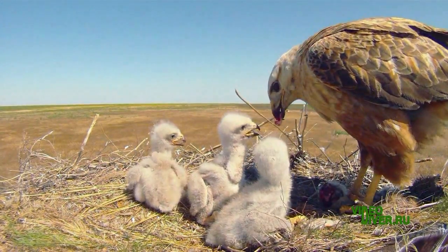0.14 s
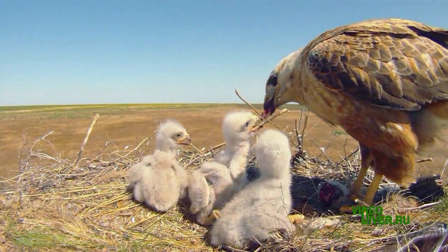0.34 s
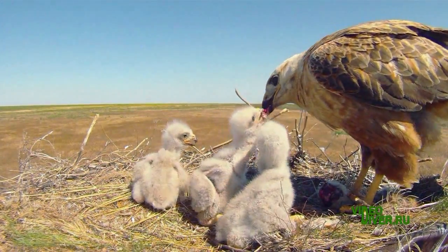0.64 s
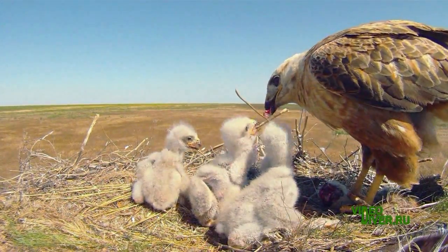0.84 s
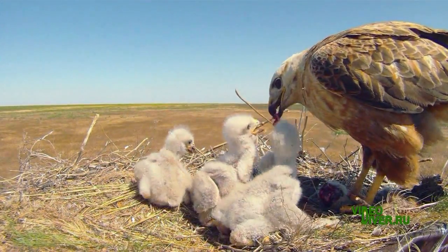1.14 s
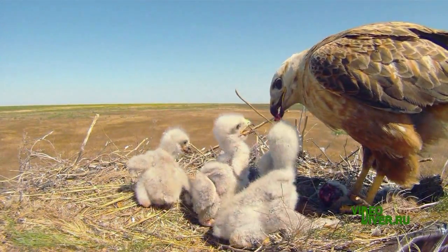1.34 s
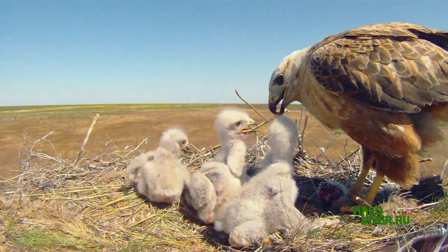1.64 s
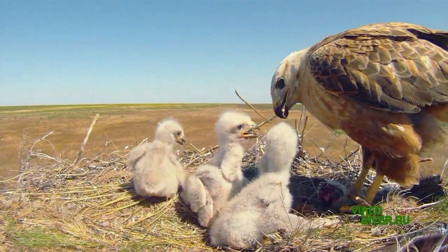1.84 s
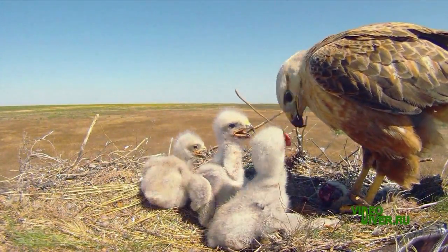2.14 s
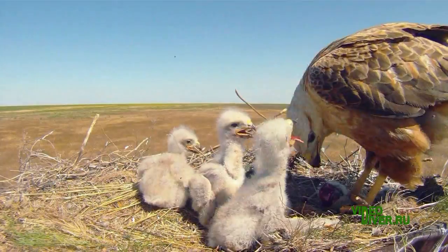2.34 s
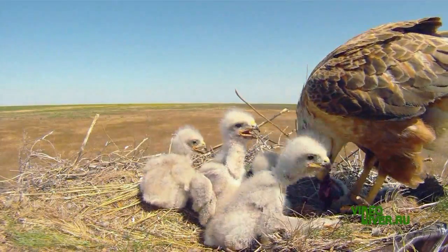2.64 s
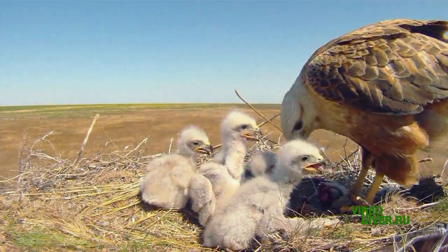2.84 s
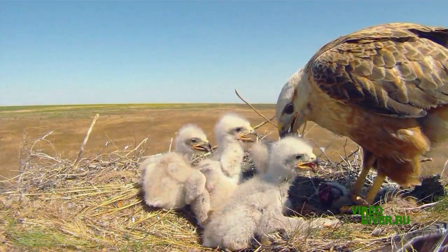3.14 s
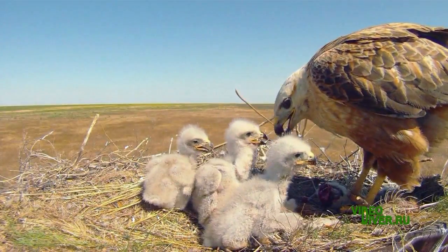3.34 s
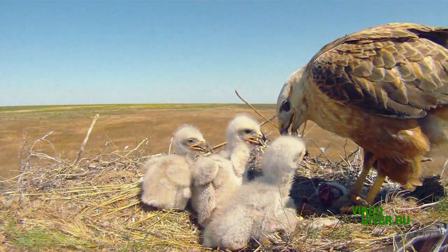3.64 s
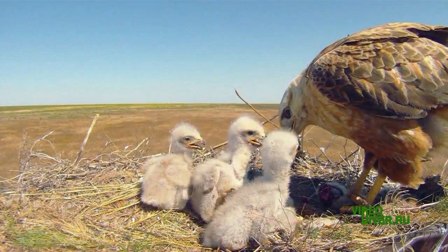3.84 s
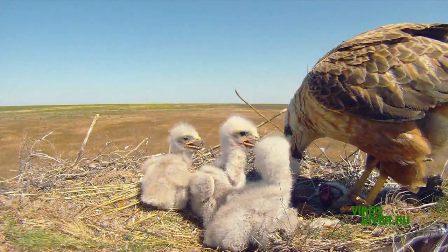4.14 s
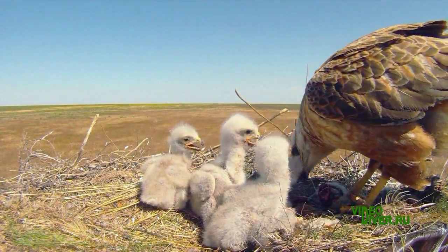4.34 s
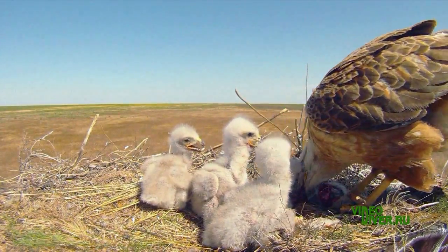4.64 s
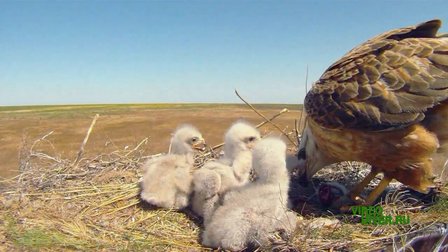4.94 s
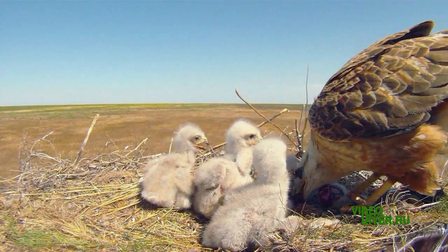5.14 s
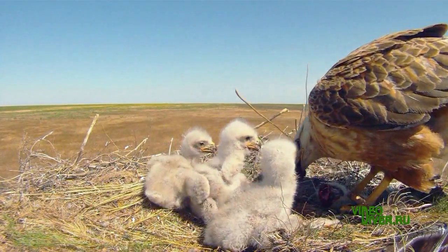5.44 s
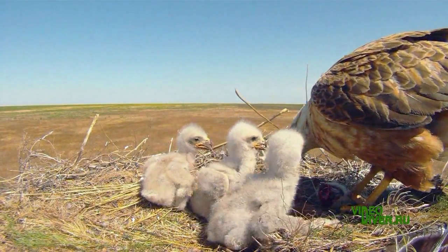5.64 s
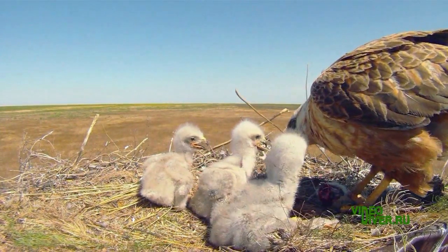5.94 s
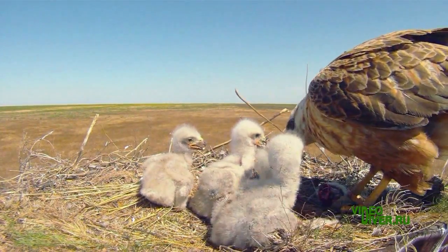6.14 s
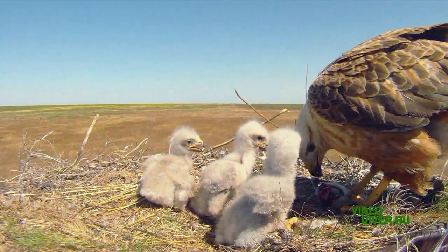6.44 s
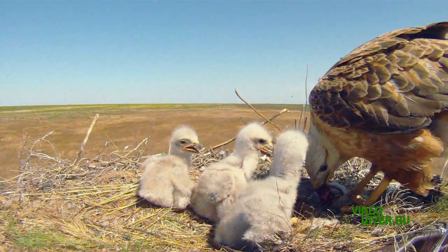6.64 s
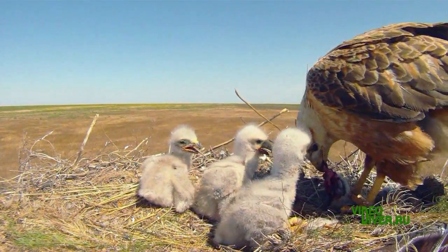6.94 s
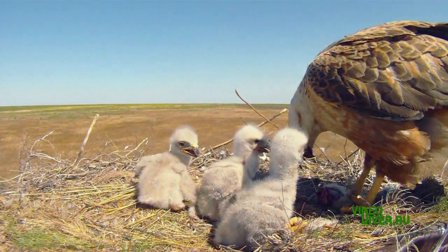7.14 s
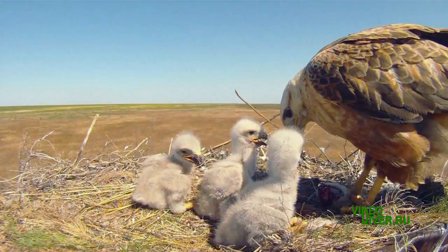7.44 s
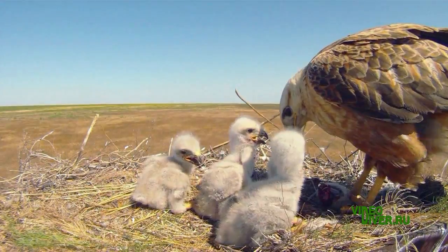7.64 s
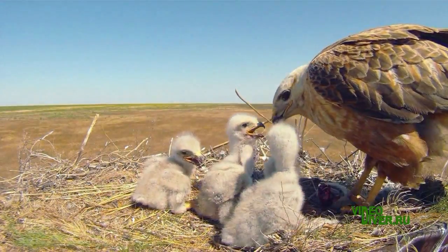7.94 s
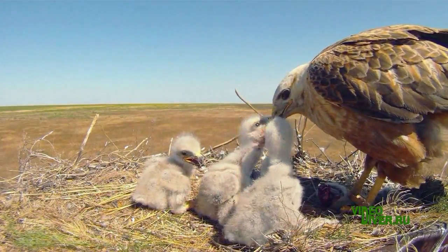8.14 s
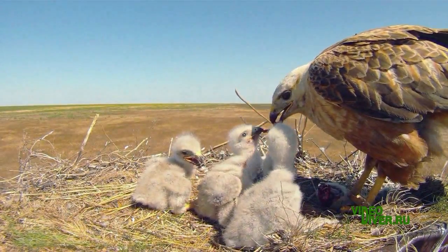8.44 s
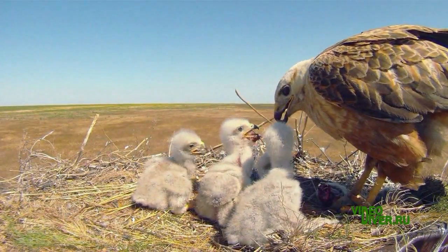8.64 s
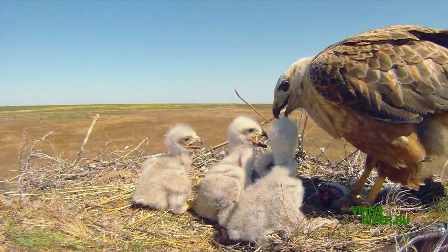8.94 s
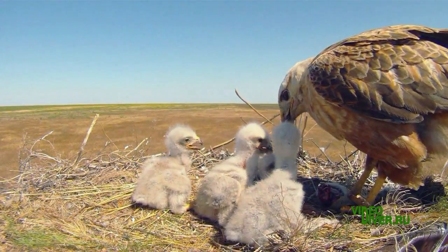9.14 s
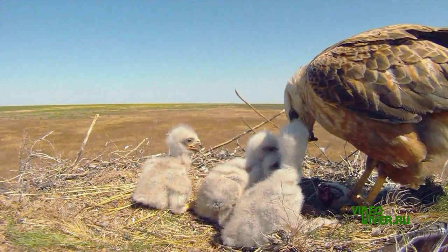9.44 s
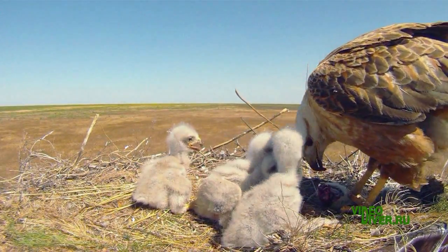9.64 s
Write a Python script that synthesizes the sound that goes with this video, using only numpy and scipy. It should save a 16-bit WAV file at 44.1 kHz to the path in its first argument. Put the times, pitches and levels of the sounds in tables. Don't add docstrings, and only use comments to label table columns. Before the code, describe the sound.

Downy raptor chicks give short sharp chips, croaks and falling peeps at an open nest, with far larks twittering and light wind bumps on the microphone.

```python
import sys
import numpy as np
from scipy import signal
from scipy.fft import rfft, irfft, next_fast_len
from scipy.io import wavfile
from scipy.ndimage import uniform_filter1d, map_coordinates

SR = 44100
rng = np.random.default_rng(int(sys.argv[2]) if len(sys.argv) > 2 else 0)


def dump_mix(stems):
    frames = np.atleast_2d(stems).T
    limited = np.clip(frames, -1, 1)
    pcm = np.round(limited * 32767).astype(np.int16)
    wavfile.write(sys.argv[1], SR, pcm)


def volts_from_decibels(level):
    exponent = np.asarray(level, float) / 20
    return 10 ** exponent


N = 431738

# (time [s], level [dB])
WIND = [(0, -38), (.4, -54.5), (.72, -41.5), (1.2, -49.5), (4, -60.5), (6.27, -56.5), (6.36, -39),
        (6.7, -45.5), (7, -59.5), (8.3, -47), (9.79, -61.5)]
# (frequency [Hz], density [dB per Hz])
BUFFET = [(8, -3.5), (25, 1), (50, -17.5), (120, -33), (200, -80)]
AIR = [(30, -14), (45, 1.5), (120, -6), (370, -12.5), (800, -19.5), (1550, -23), (4000, -21.5), (6870, -32),
       (11200, -33.5), (13600, -40.5)]
# (frequency [Hz], level [dB])
WHINE = [(9132, -89), (10880, -88.5), (11741, -92), (13297, -96)]

# (time [s], low flock level [dB], high flock level [dB])
CHORUS = [(0, -58.5, -59.5), (.7, -59, -64), (1.5, -55, -62.5), (2.6, -57, -61.5), (3.6, -57, -61.5),
          (6.2, -60, -61.5), (6.8, -61.5, -65), (7.7, -56, -57), (8.5, -60, -65.5), (9.79, -60, -64)]
# (frequency [Hz], density [dB per Hz])
LOW_LARKS = [(1500, -33), (2200, -6), (3000, -5), (3900, -1.5), (4600, -1.5), (5500, -48)]
HIGH_LARKS = [(3800, -31), (4400, 0), (5300, -3), (6200, -12.5), (7000, -19), (8000, -50)]
# (time [s], length [s], middle pitch [Hz], level [dB])
LEVEL_NOTES = [(.056, .044, 3860, -52.5), (.246, .054, 3440, -56), (1.6, 0.036, 3488, -55),
               (2, 0.05, 5093, -52), (2.855, .035, 5400, -55), (3.29, .045, 5400, -57),
               (5.252, .04, 4950, -55), (4.1, .11, 4280, -57.5), (1.815, .06, 5600, -58),
               (1.52, .07, 5100, -57), (6.705, .045, 5850, -62.5), (3.43, .09, 4700, -58),
               (.45, .1, 4100, -53.5), (9.62, .06, 4400, -54), (5.55, .045, 4550, -53),
               (6.955, 0.044, 4300, -56), (6.996, 0.079, 3880, -50.5), (7.205, .095, 5150, -52.5),
               (7.225, .07, 5750, -58), (7.429, .026, 3720, -49.5), (7.455, 0.057, 5400, -53.5),
               (7, .028, 4691, -55), (7.956, .053, 5200, -51), ]
FALLING_NOTES = [(1.443, 0.037, 3050, -56), (3.58, .06, 3700, -58), (8.612, .03, 3500, -56),
                 (7.717, .099, 2760, -61.5), (9.542, 0.049, 2780, -57)]
RISING_NOTES = [(1.077, 0.014, 4700, -44), (1.812, 0.011, 3960, -42), (3.87, .067, 4700, -59),
                (5.12, .012, 4520, -50), (5.815, .05, 4150, -56), (7.675, .05, 4400, -58),
                (3.545, .022, 4500, -52), (7.555, 0.0245, 4984, -47), (8.2775, 0.011, 4050, -44),
                (8.969, 0.018, 4130, -45.5), (8.99, 0.03, 5300, -57)]
ARCHED_NOTES = [(1.27, 0.1, 5620, -54.5), (1.515, 0.09, 5560, -56), (1.769, 0.1, 5740, -54.5),
                (7.487, 0.073, 4300, -48.5), (8.235, .04, 5300, -57)]
DIPPED_NOTES = [(.018, 0.036, 4140, -51.5), (4.082, .08, 3980, -56), (4.436, 0.085, 4050, -56),
                (7.172, 0.02, 3880, -53)]
PLUNGING_NOTES = [(6.568, .012, 4600, -53), (7.206, .05, 2900, -55.5)]
CLEAR_NOTES = [(.765, .026, 3010, -62), (.81, 0.08, 2700, -60), (.965, .03, 3050, -59),
               (4.72, 0.051, 5160, -58), (5.03, .032, 4600, -54), (1.71, 0.075, 3000, -58),
               (3.955, 0.032, 4300, -63), (7.955, 0.033, 5430, -52), (1.955, .02, 4000, -54),
               (8.957, .036, 2450, -55), (2.24, 0.066, 5100, -62), (2.295, .04, 3500, -58),
               (2.44, .04, 3040, -56), (6.655, .045, 4530, -58), (7.732, 0.051, 5060, -47.5),
               (9.028, .01, 5050, -44)]
SLIDING_NOTES = [(2.72, .15, 4050, -57.5), (5.895, .13, 4870, -56), (6.03, 0.052, 4200, -51),
                 (8.262, .016, 4500, -52), (8.293, 0.046, 4000, -51), (2.175, .045, 2300, -61),
                 (2.315, .04, 2350, -58.5), (2.335, .06, 4200, -57), (2.49, 0.038, 2900, -57),
                 (7.61, .105, 3350, -57)]
HOOKED_NOTES = [(7.777, .026, 3700, -50), (7.822, 0.023, 3700, -53), (7.852, 0.021, 3900, -56)]
UP_GLIDES = [(3.395, .055, 3250, -60), (3.483, .035, 3250, -60), (3.13, 0.034, 3800, -53),
             (1.262, .035, 4300, -57), (1.3, .025, 4700, -59), (8.54, .018, 4000, -57),
             (1.612, .016, 4200, -53)]
DOWN_GLIDES = [(3.266, .025, 3300, -60), (3.368, 0.0275, 3900, -59), (4.068, .035, 2700, -60),
               (8.562, 0.032, 4450, -55), (9.4, 0.0174, 4150, -54), (7.93, .06, 2800, -60),
               (3.81, 0.0202, 3200, -56)]
NOTE_SHAPES = [(LEVEL_NOTES, 1.002, 0.97, 1.05), (FALLING_NOTES, 1.06, .93, 1),
               (RISING_NOTES, .87, 1.1, .7), (ARCHED_NOTES, .84, .88, .85), (DIPPED_NOTES, 1.1, 1.04, .5),
               (PLUNGING_NOTES, 1.14, .66, .6), (CLEAR_NOTES, .98, 1, .5), (SLIDING_NOTES, 1.08, .92, .75),
               (HOOKED_NOTES, 1.36, 1.3, .4)]
# (time [s], notes [count], spacing [s], pitch [Hz], level [dB])
TRILLS = [
    (3.992, 5, .018, 4620, -54),
    (8.478, 3, .024, 4300, -58),
]

# (time [s], pitch [Hz], level [dB])
WHISTLES = [
    [(5.5673, 3180, -60), (5.5898, 4060, -39), (5.6197, 4350, -43), (5.6631, 5570, -39.5),
     (5.705, 5860, -43), (5.7574, 5980, -47)],
    [(5.738, 5450, -49), (5.7559, 5276, -48.5), (5.79, 5800, -45), (5.81, 5900, -45), (5.818, 6150, -46),
     (5.8801, 6270, -45), (5.9355, 6480, -47.4), (5.9924, 6223, -54), (6.045, 3950, -55)],
    [(7.5114, 4830, -46), (7.5758, 5410, -39), (7.6027, 5850, -38.5), (7.6416, 5830, -44),
     (7.715, 6330, -43), (7.735, 6300, -44), (7.8092, 6790, -43), (7.8856, 6270, -48), (7.9065, 5550, -52),
     (7.933, 3900, -51)],
    [(9.3612, 3187, -49), (9.3941, 4040, -40), (9.4046, 4630, -43), (9.432, 4820, -45)],
    [(9.424, 5050, -42), (9.4465, 5410, -39), (9.5513, 6180, -42.5), (9.615, 6520, -47.5),
     (9.629, 6400, -45), (9.69, 6810, -48), (9.745, 6960, -51), (9.7893, 6760, -48)],
]
# (time [s], length [s])
FLUTTERS = [(5.62, .03), (5.665, .06), (5.79, 0.021), (5.866, 0.042), (7.545, 0.027), (7.606, .075),
            (9.402, 0.027), (9.475, 0.056)]

# (time [s], peak level [dB])
CLICKS = [(.748, -47), (.768, -47), (.784, -50), (.798, -49), (.814, -49), (.857, -51), (7.045, -47),
          (7.065, -44), (7.077, -47), (8.086, -45), (8.092, -49), (8.103, -50)]

# (time [s], length [s], chest croak level [dB], throat rasp level [dB])
CROAKS = [(1.6, 0.022, -47.5, -52), (1.85, .045, -54.5, -65), (2.256, 0.013, -49.5, -66),
          (2.7, 0.082, -59.5, -54.5), (3.173, 0.011, -46.5, -50), (3.19, .02, -55, -52),
          (3.537, 0.073, -54.5, -54), (4.159, 0.055, -50.5, -51), (4.597, 0.041, -55, -50),
          (4.633, 0.0122, -56, -35.5), (4.646, .032, -54.5, -46), (4.953, 0.05, -50.5, -46),
          (5.348, 0.044, -51.5, -49), (5.726, 0.053, -52.5, -45), (6.138, 0.039, -52.5, -48.5),
          (6.764, .045, -51.5, -49)]
# (time [s], length [s], wide hiss level [dB])
HISSES = [(.339, 0.021, -47), (1.878, .02, -54), (3.628, 0.026, -44), (4.628, 0.037, -46.5),
          (5.196, .028, -43.5), (8.006, 0.027, -44.5), (8.335, 0.0285, -45.5), (8.755, 0.035, -44.5),
          (9.035, 0.042, -50)]

# (peak time [s], pitch [Hz], level [dB], tail [s], loss over tail [dB])
CHIPS = [(0.3378, 4540, -32.5, 0.0044, 7), (1.336, 2214, -43.5, 0.0075, -3),
         (1.606, 3840, -39.5, 0.0082, 16), (1.882, 4130, -32, 0.004, 8), (2.2569, 3900, -43.5, 0.013, 12),
         (2.555, 5000, -35, .005, 10), (2.7517, 4120, -39.5, 0.013, 20), (3.172, 3920, -32, 0.0095, 31),
         (3.587, 4220, -31.5, 0.0033, 13), (3.592, 3300, -42, 0.0065, 7), (3.6327, 4320, -28, .002, 2),
         (4.638, 4400, -35, .004, 3), (5.197, 4600, -32, .003, 4), (6.774, 3900, -43, .004, 12),
         (8.0075, 4990, -41, 0.0043, -1), (8.3372, 4800, -36, 0.0045, 3), (8.7601, 5520, -38, 0.0051, 15),
         (9.038, 4800, -37, 0.0044, -3)]
# (start [s], scoop and bend [s], top pitch [Hz], slide [kHz per s], level [dB])
CLEAR_PEEPS = [(4.669, .027, 5100, 148, -30.5)]
HISSY_PEEPS = [(5.202, 0.016, 5250, 239, -30), (8.0132, 0.0091, 4500, 190.4, -32.5),
               (8.343, 0.012, 4950, 198, -32), (8.765, .02, 5400, 199.5, -30),
               (9.0466, 0.018, 5000, 229.7, -32)]
LOW_PEEPS = [(.3438, 0.0067, 3290, 210, -35.5), (1.886, 0.011, 3250, 230, -35),
             (3.636, .008, 3800, 175, -33.5)]
SCOOPED_PEEPS = [(1.978, .028, 5300, 164, -31.5)]
SOFT_PEEPS = [(1.091, .008, 4560, 150, -34)]
# (scoop share of time [0-1], scoop depth [Hz], lowest note [Hz], fade on it [s], soft start [dB],
# throat as (pitch [Hz], level [dB]))
CLEAR_CHICK = (0.69, 250, 2210, .009, 9.3, [(2100, -2.5), (2700, -3.5), (3300, -4), (3900, 1), (4600, -6),
               (5200, -6)])
HISSY_CHICK = (0.199, 420, 1870, 0.0041, 3.6, [(1800, -7.5), (2100, -6), (2700, -3.5), (3300, 1.4),
               (4000, -3), (4700, -9)])
LOW_CHICK = (0.245, 300, 1740, 0.0048, 5.9, [(1700, -5.5), (2100, -4), (3000, 1.5), (3900, -1.5)])
SCOOPING_CHICK = (.48, 1200, 2150, 0.0045, .4, CLEAR_CHICK[-1])
SOFT_CHICK = (.2, 100, 2450, 0.0076, 3, [(2400, -4), (3000, -1), (3800, -3), (4500, -12)])
# (note pitch [Hz], level [dB])
PEEP_OVERTONE = [(1700, -2.5), (2300, -4.5), (3000, -13), (3700, -24.5), (4300, -34), (5000, -48)]
DROP_OVERTONE = [(1700, 17), (2100, 21), (2800, 1), (3400, -30), (4000, -59)]
HARD_OVERTONE = [(2000, -3), (3000, -8), (3600, -32), (4200, -50)]
# (upper note pitch [Hz], level [dB])
HALF_NOTE = [(2600, -43), (3000, -14), (3500, -13), (4000, -40)]
# (time [s], pitch [Hz], level [dB])
DRAWN_OUT = [(1.7055, 3800, -41), (1.709, 4400, -40), (1.716, 4390, -42), (1.725, 4050, -33.5),
             (1.735, 3700, -34.5), (1.742, 2750, -41), (1.748, 2150, -39), (1.757, 1800, -56)]
KINKED = [(6.782, 4700, -54), (6.788, 5040, -49), (6.796, 4690, -47), (6.8005, 4050, -30.5),
          (6.8025, 3500, -37), (6.804, 2850, -35.5), (6.811, 2460, -46), (6.818, 2100, -52),
          (6.823, 1850, -57)]
# (break time [s], level [dB], lead-in top [Hz], lower note level [dB], lowest pitch [Hz])
CRIES = [
    (2.5985, -26, 6400, -2.5, 2310),
    (3.2377, -24.5, 5400, -2.5, 2323),
]
# (time from break [s], pitch [ratio to top], level [dB])
CRY_LEAD = [(-.032, .7, -14), (-.027, .92, -17), (-.021, 0.96, -16.5), (-.015, .99, -14),
            (-.0095, .87, -15.5)]
# (time from break [s], pitch [Hz], level [dB])
CRY_UPPER = [(-.004, 4030, 1), (-.0003, 3760, -1)]
# (time from break [s], pitch [ratio to lowest], level over lower note [dB])
CRY_LOWER = [(.0025, 1.22, -4.5), (.006, 1.001, -0.1), (.019, .91, -42)]
# (tick time [s], tick level [dB], loudest drop time [s], drop level [dB],
# throat resonance depth [0-1])
DROPS = [
    (4.95, -30.5, 4.9955, -20, 0.97),
    (5.345, -36.5, 5.3895, -20, 0.98),
    (5.725, -30, 5.7785, -20, 0.97),
    (6.141, -32, 6.1775, -22.5, 0.92),
]
DROP_PACES = [1, 0.99, 1, .85]
# (time from loudest [s], pitch [Hz], level [dB])
TICK = [(-.006, 3670, -16), (-.002, 3750, -7), (0, 3900, 1.5), (.0045, 3780, -16)]
DROP = [(-.036, 6334, -56), (-.022, 6500, -40), (-.008, 5400, -32), (-.003, 4330, -5), (0, 3920, 0),
        (.0033, 3560, -5.5), (.0046, 2950, -22), (.011, 2454, -28.5), (.023, 1620, -38.5)]
# (time [s], pitch [Hz], level [dB])
OWN_DROPS = [
    [(4.167, 3900, -50), (4.169, 3950, -39), (4.1715, 3900, -54)],
    [(4.175, 5900, -65), (4.192, 6850, -56), (4.203, 5600, -50), (4.2062, 4700, -38), (4.2095, 4040, -20),
     (4.213, 3710, -24), (4.218, 3150, -40), (4.2235, 2450, -46), (4.236, 1740, -59)],
    [(4.598, 3700, -46), (4.602, 3900, -31), (4.605, 4420, -33), (4.6085, 3650, -36)],
    [(4.626, 6700, -60), (4.634, 6300, -51), (4.6445, 5510, -53), (4.647, 5040, -30), (4.653, 4250, -23),
     (4.6565, 3890, -20), (4.6595, 3500, -23), (4.661, 3050, -35), (4.671, 1600, -41)],
    [(4.716, 2750, -46), (4.722, 2410, -48), (4.728, 2150, -56)],
]


def unit(x):
    return x / np.sqrt(np.mean(x ** 2) + 1e-20)


def along(points, hz):
    f, v = np.transpose(points)
    return np.interp(np.log(hz + 1), np.log(f + 1), v)


def curves(rows):
    s, *cols = np.transpose(rows)
    return [np.interp(np.arange(N) / SR, s, c) for c in cols]


def wobble(rate_hz, size=N):
    knots = rng.standard_normal(int(size * rate_hz / SR) + 4)
    return map_coordinates(knots, [np.arange(size) * rate_hz / SR], order=1)


def coloured(x, spectrum):
    m = next_fast_len(len(x) + 8192)
    gain = volts_from_decibels(along(spectrum, np.fft.rfftfreq(m, 1 / SR)))
    return unit(irfft(rfft(x, m) * gain, m)[:len(x)])


def add(track, s, x):
    part = track[max(round(s * SR), 0):][:len(x)]
    part += x[:len(part)]


def note(rows, fade_s, overtone, rough, bend_s=0.0013, waver=0):
    s, hz, db = np.transpose(rows)
    t = np.arange(s[0], s[-1], 1 / SR)
    hz = uniform_filter1d(np.interp(t, s, hz), size=int(bend_s * SR) + 1)
    waver_now = np.broadcast_to(waver, N)[(t * SR).astype(int)]
    hz = hz * (1 + waver_now * wobble(148.3, size=len(t)))
    phase = 2 * np.pi * np.cumsum(hz) / SR + rng.uniform(0, 2 * np.pi)
    edges = np.sin(np.pi / 2 * np.clip(np.minimum(t - s[0], s[-1] - t) / fade_s, 0, 1))
    level = uniform_filter1d(np.interp(t, s, volts_from_decibels(db / 2)) ** 2, size=40)
    second = volts_from_decibels(along(overtone, hz)) * np.sqrt(level / volts_from_decibels(-31.5))
    third = .75 * second ** 2 / (1 + second ** 6) * np.clip((2750 - hz) / 400, 0, 1)
    tone = np.sin(phase) + second * np.sin(2 * phase) + third * np.sin(3 * phase)
    return np.sqrt(2) * level * edges * tone * (1 + rough * wobble(604, size=len(t)))


def air():
    gusty = rng.standard_normal(N) * volts_from_decibels(wobble(6.9))
    buffet = volts_from_decibels(curves(WIND)[0]) * coloured(gusty, BUFFET)
    hiss = volts_from_decibels(-55) * coloured(rng.standard_normal(N), AIR)
    t = np.arange(N) / SR
    whine = sum(np.sqrt(2) * volts_from_decibels(db) * np.sin(2 * np.pi * hz * t) for hz, db in WHINE)
    return buffet + hiss + whine


def lark_note(s, length_s, start_hz, middle_hz, end_hz, db, buzz):
    rows = [(s, start_hz, db - 0.5), (s + length_s / 2, middle_hz, db), (s + length_s, end_hz, db + 0.5)]
    buzzy = buzz * np.clip(middle_hz / 2500 - 1, .45, 1)
    tone = note(rows, min(.007, length_s / 4), [(3000, -60)], rough=.9 * buzzy,
                bend_s=length_s / 3, waver=.02 * buzzy)
    fray = np.clip(buzzy - .4, 0, .7)
    return tone * (1 - fray + fray * wobble(1100, size=len(tone)))


def trill_notes():
    return [(s + k * gap_s, 0.8 * gap_s, hz, db)
            for s, count, gap_s, hz, db in TRILLS for k in range(count)]


def flock(spectrum, centre_hz, count):
    notes_per_s = 13
    out = .5 * unit(rng.standard_normal(N) * volts_from_decibels(1.5 * wobble(12)))
    for _ in range(count):
        beat = np.cumsum(notes_per_s * np.exp(.4 * wobble(6))) / SR
        traits = rng.standard_normal((5, int(beat[-1]) + 1))
        pitch, slope, db, hoarse, arch = traits[:, beat.astype(int)]
        place = beat % 1 - .5
        shake = .03 * np.clip(hoarse + .5, 0, 1) * wobble(170)
        hz = centre_hz * np.exp(.19 * pitch + .26 * slope * place + .5 * arch * place ** 2 + shake)
        buzz = (.6 + np.clip(hoarse + .9, 0, 1) * wobble(1050)) * np.sin(np.pi * beat) ** 2
        strength = volts_from_decibels(8 * np.tanh(db + .9 * wobble(4)) - 4)
        out += .4 * np.sin(2 * np.pi * np.cumsum(hz) / SR) * buzz * strength
    return coloured(out, spectrum)


def larks():
    field_t60_s, field_db = .12, -7.5
    singles = np.zeros(N)
    shapes = NOTE_SHAPES + [(trill_notes(), .96, 1.05, .3), (UP_GLIDES, .84, 1.3, .45),
                            (DOWN_GLIDES, 1.22, .82, .45)]
    for notes, start, end, buzz in shapes:
        for s, length_s, hz, db in notes:
            add(singles, s, lark_note(s, length_s, start * hz, hz, end * hz, db, buzz))
    low_db, high_db = curves(CHORUS)
    flocks = volts_from_decibels(low_db - 0.54) * flock(LOW_LARKS, 3500, count=7)
    flocks += volts_from_decibels(high_db - 1.16) * flock(HIGH_LARKS, 5100, count=4)
    t = np.arange(SR // 4) / SR
    tail = rng.standard_normal(len(t)) * volts_from_decibels(-60 * t / field_t60_s)
    scattered = signal.fftconvolve(flocks + 0.58 * singles, tail / np.linalg.norm(tail))[:N]
    return singles + flocks + volts_from_decibels(field_db) * scattered


def whistles():
    out, shaky = np.zeros(N), np.zeros(N)
    for s, length_s in FLUTTERS:
        add(shaky, s, signal.windows.tukey(round(length_s * SR), .3))
    overtone = [(3500, -33), (4500, -30), (5500, -60)]
    for rows in WHISTLES:
        add(out, rows[0][0], note(rows, 0.0024, overtone, rough=0.068, bend_s=0.008,
                                  waver=0.004 + .013 * shaky))
    flutter = -.45 * np.abs(wobble(260)) + .45 * wobble(900) + .3 * wobble(2400)
    return out * (1 + shaky * flutter)


def clicks():
    click_hz, t60_s = 960, 0.0095
    out, t = np.zeros(N), np.arange(SR // 50) / SR
    for (s, db), pitch in zip(CLICKS, rng.normal(1, .1, len(CLICKS))):
        ring = np.sin(2 * np.pi * pitch * click_hz * t)
        add(out, s - .001, volts_from_decibels(db + 3 - 60 * t / t60_s) * ring)
    return out


def croaks():
    puffs = rng.standard_normal(N) * volts_from_decibels(4.5 * np.tanh(wobble(280)))
    chest = coloured(puffs, [(450, -23), (750, 0.5), (1100, 3), (1600, -9), (2400, -37)])
    throat = coloured(puffs, [(2200, -19.5), (3400, -11), (3950, 0), (4600, -11.5), (6800, -23), (8000, -52)])
    hiss = coloured(puffs, [(700, -28), (1600, -1.5), (3000, -9), (6000, -7.0), (7200, -23.0),
                            (10000, -32), (12000, -52)])
    rows = [(*row, row[3] - 25) for row in CROAKS]
    rows += [(s, length_s, db - 12.5, db - 7.5, db) for s, length_s, db in HISSES]
    out = np.zeros(N)
    for s, length_s, chest_db, throat_db, hiss_db in rows:
        span = slice(round(s * SR), round((s + length_s) * SR))
        mix = volts_from_decibels(chest_db) * chest[span] + volts_from_decibels(throat_db) * throat[span] + volts_from_decibels(hiss_db) * hiss[span]
        swell = np.linspace(.3, 1.45, len(mix))
        add(out, s, mix * signal.windows.tukey(len(mix), .3) * swell)
    return out


def chip(s, hz, db, tail_s, loss_db):
    rise_s, rise_db, start_ratio, sag_per_s = .0045, 19, 1.1, 52.6
    u = np.array([.5, 1])
    sag = np.transpose([s + u * tail_s, hz * np.exp(-sag_per_s * u * tail_s), db - loss_db * u ** 0.84])
    return [(s - rise_s, start_ratio * hz, db - rise_db), (s, hz, db), *sag]


def peep(row, chick):
    s, arch_s, top_hz, slide_khz_per_s, db = row
    share, scoop_hz, low_hz, fade_s, soft_db, throat = chick
    rise_s, bend_s = share * arch_s, (1 - share) * arch_s
    slide_hz_per_s = 1000 * slide_khz_per_s
    end_s = arch_s + (top_hz - low_hz) / slide_hz_per_s - bend_s / 2
    t = np.linspace(0, end_s, num=30)
    fall_s = np.clip(t - rise_s, 0, bend_s) ** 2 / (2 * bend_s) + np.clip(t - arch_s, 0, None)
    hz = top_hz - scoop_hz * np.clip(1 - t / rise_s, 0, 1) ** 2 - slide_hz_per_s * fall_s
    level_db = db + along(throat, hz) - soft_db * np.clip(1 - t / arch_s, 0, 1)
    last = (s + end_s + fade_s, 0.92 * low_hz, level_db[-1] - 26)
    return [*np.transpose([s + t, hz, level_db]), last]


def cry(s, db, top_hz, lower_db, low_hz):
    lead = np.multiply(CRY_LEAD, [1, top_hz, 1])
    lower = np.multiply(CRY_LOWER, [1, low_hz, 1]) + [0, 0, lower_db]
    return np.vstack([lead, CRY_UPPER, lower]) + [s, 0, db]


def syllables():
    voices = [(SOFT_PEEPS, SOFT_CHICK), (SCOOPED_PEEPS, SCOOPING_CHICK), (CLEAR_PEEPS, CLEAR_CHICK),
              (HISSY_PEEPS, HISSY_CHICK), (LOW_PEEPS, LOW_CHICK)]
    out = [DRAWN_OUT] + [chip(*row) for row in CHIPS] + [cry(*row) for row in CRIES]
    return out + [peep(row, chick) for rows, chick in voices for row in rows]


def half_notes(out):
    for rows, chick in [(HISSY_PEEPS, HISSY_CHICK), (LOW_PEEPS, LOW_CHICK)]:
        for row in rows:
            s, hz, db = np.transpose(peep(row, chick))
            half = np.transpose([s, hz / 2, db + along(HALF_NOTE, hz)])
            add(out, s[0], note(half, .001, [(3000, -60)], rough=.5))


def drops(out):
    for (tick_s, tick_db, drop_s, drop_db, depth), pace in zip(DROPS, DROP_PACES):
        tick = np.add(TICK, [0, 0, tick_db])
        add(out, tick_s + TICK[0][0], note(tick, .001, DROP_OVERTONE, rough=0.24))
        drop = np.multiply(DROP, [pace, 1, depth]) + [0, 0, drop_db]
        add(out, drop_s + pace * DROP[0][0], note(drop, 0.0028, DROP_OVERTONE, rough=0.16, waver=0.0054))
    for rows, overtone in zip(OWN_DROPS, 2 * [DROP_OVERTONE] + 3 * [HARD_OVERTONE]):
        add(out, rows[0][0], note(rows, .0008, overtone, rough=.2, waver=.006))


def peeps():
    out = np.zeros(N)
    for rows in syllables():
        add(out, rows[0][0], volts_from_decibels(0.85) * note(rows, 0.00027, PEEP_OVERTONE, rough=0.3, waver=0.012))
    half_notes(out)
    kinked_overtone = [(1900, 23), (2400, 6.5), (3000, -6), (3600, -35)]
    add(out, KINKED[0][0], note(KINKED, .001, kinked_overtone, rough=.2, waver=.008))
    drops(out)
    floor = volts_from_decibels(-27) * np.roll(out, round(0.0085 * SR))
    body = volts_from_decibels(-31) * np.roll(out, round(0.0115 * SR))
    return out + floor + body


def scene():
    return np.tile(air() + larks() + whistles() + clicks() + croaks() + peeps(), (2, 1))


def roll_off(x):
    return signal.sosfilt(signal.butter(12, 13760, fs=SR, output="sos"), x)


def record(dry):
    top_hz = 13720
    apart = volts_from_decibels(-88.0) * coloured(rng.standard_normal(N), [(2500, -39), (4000, -3), (9000, -27), (13000, -5.0)])
    trace = dry[0] * wobble(90)
    apart += volts_from_decibels(-66.5) * coloured(trace, [(3000, -32), (4500, -0.5), (6500, -2.0), (9000, 3), (13000, 8)])
    m = next_fast_len(N)
    passed = np.fft.rfftfreq(m, 1 / SR) < top_hz
    mix = irfft(rfft(dry + apart * [[1], [-1]], m) * passed, m)[:, :N]
    return roll_off(mix)


dry = scene()
out = record(dry)
dump_mix(out)
```